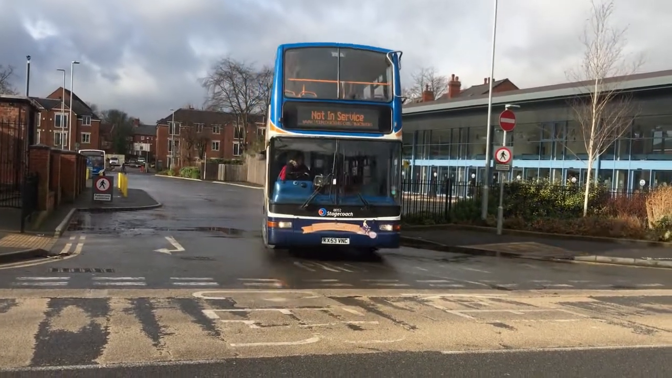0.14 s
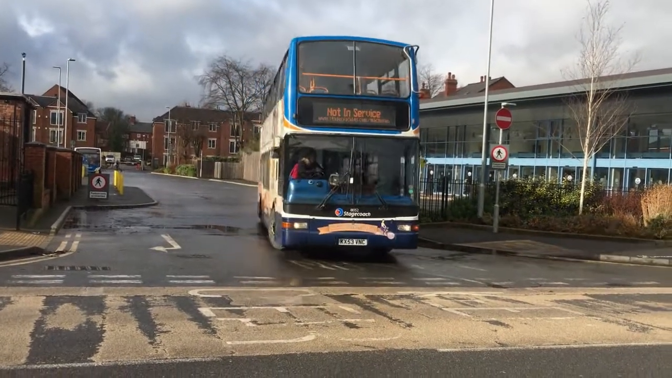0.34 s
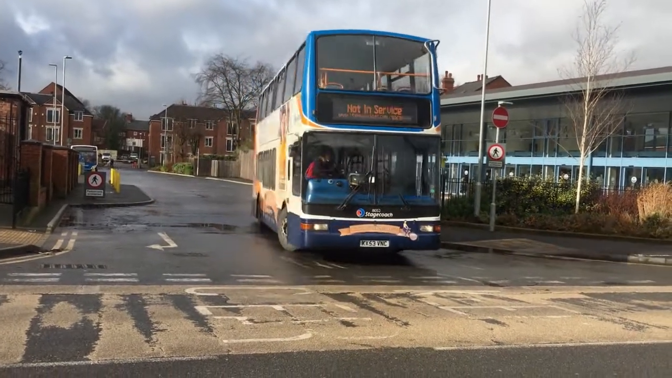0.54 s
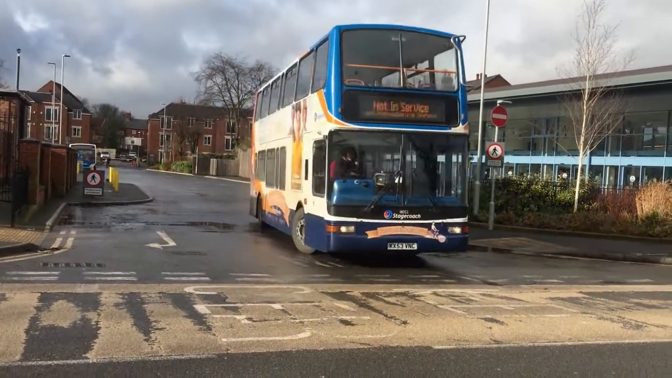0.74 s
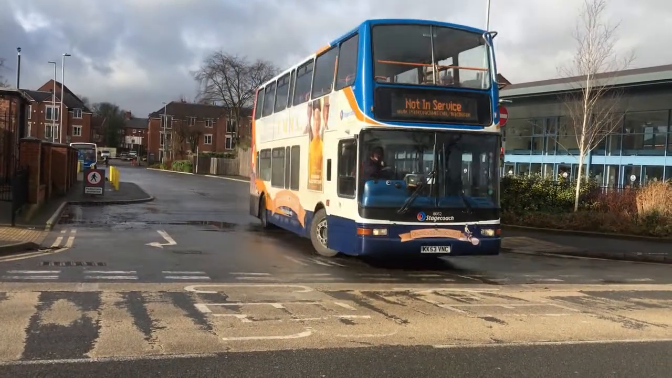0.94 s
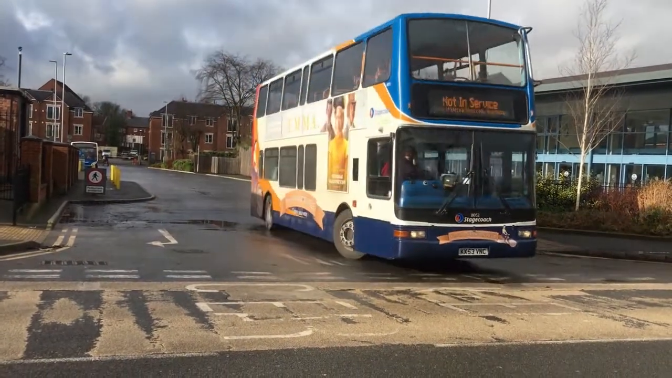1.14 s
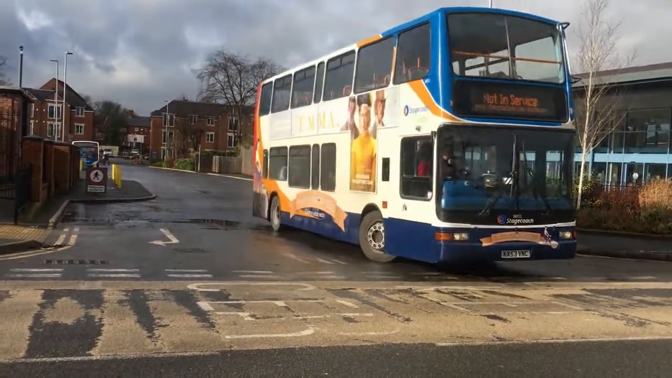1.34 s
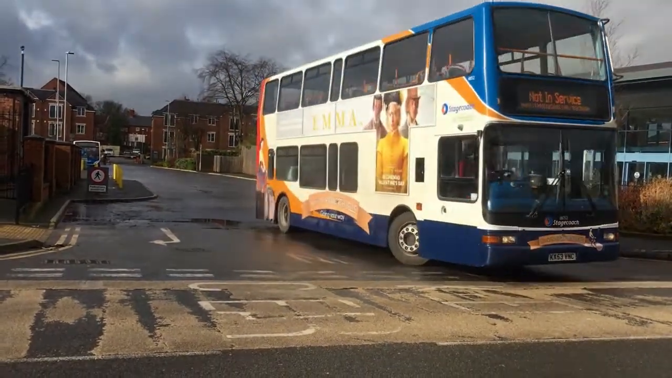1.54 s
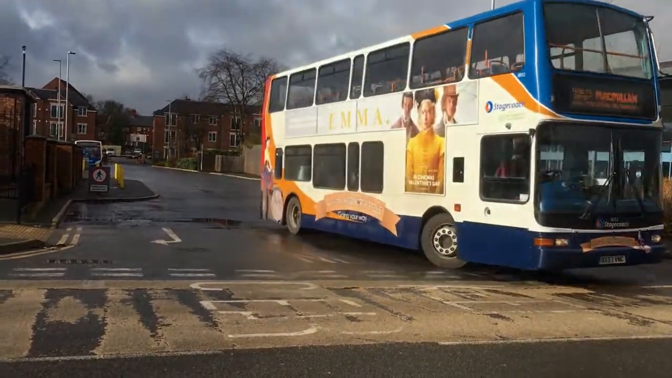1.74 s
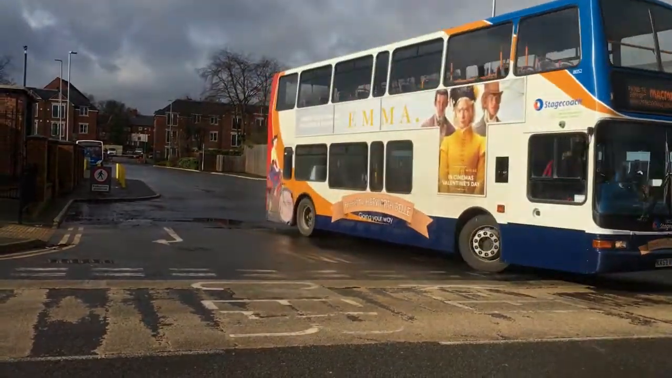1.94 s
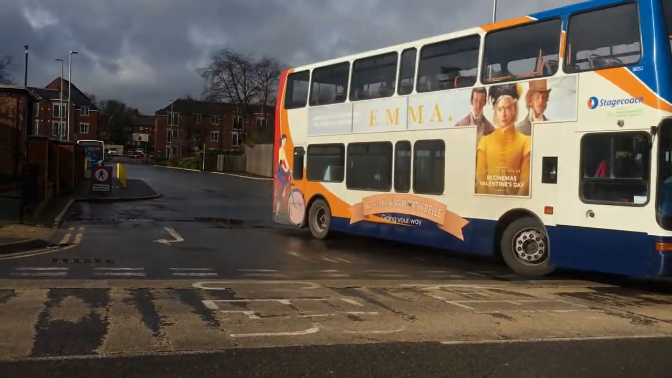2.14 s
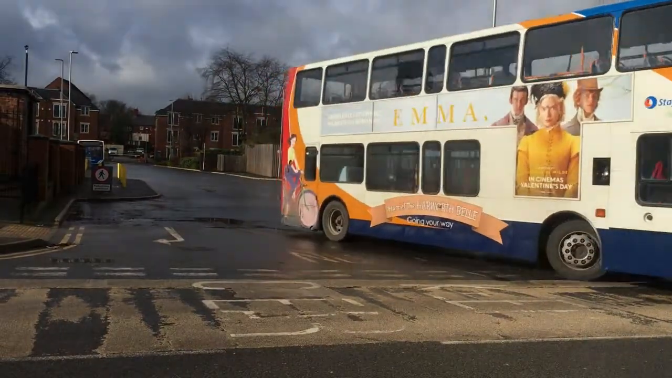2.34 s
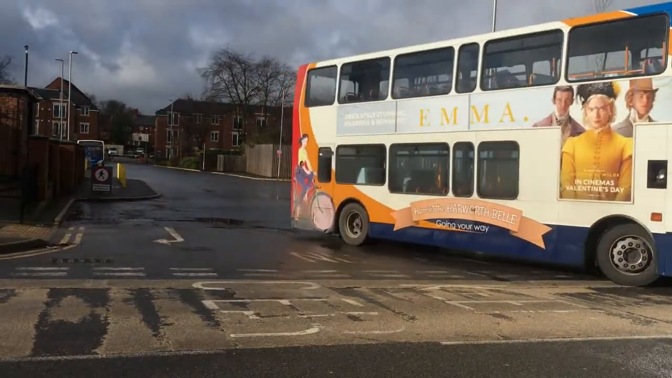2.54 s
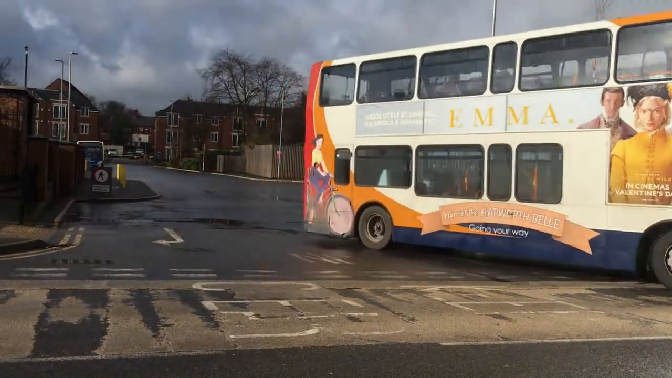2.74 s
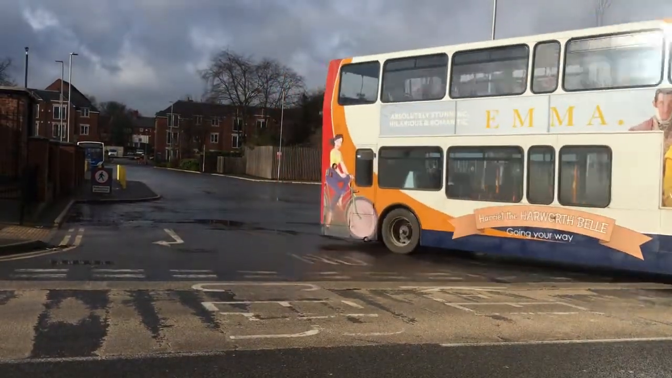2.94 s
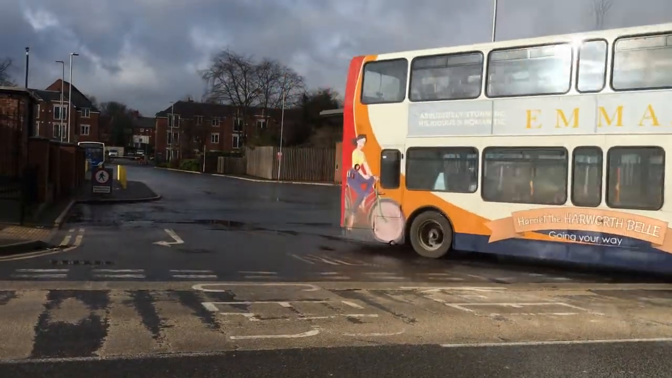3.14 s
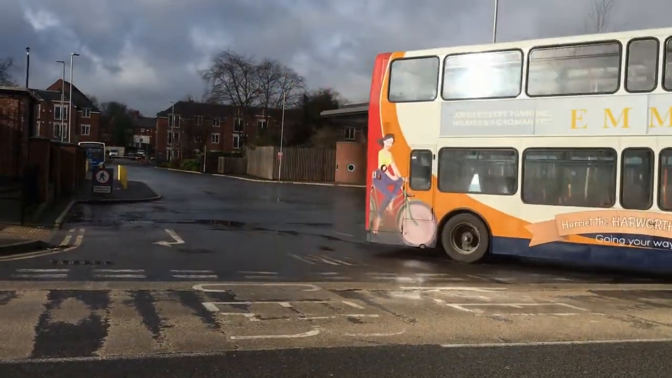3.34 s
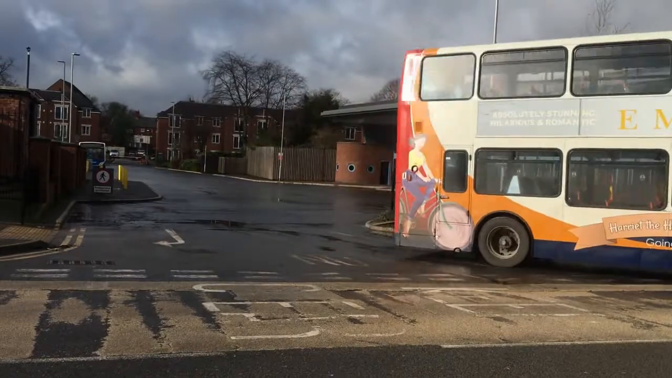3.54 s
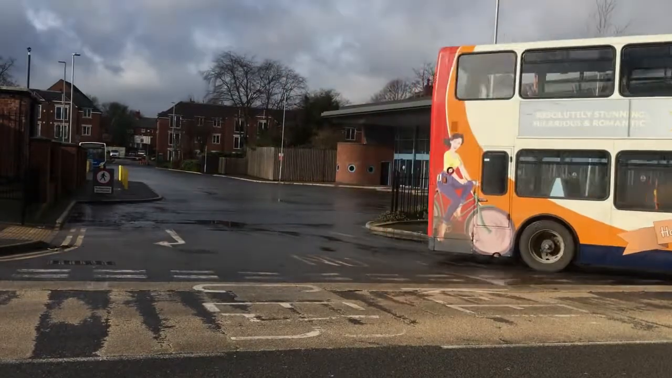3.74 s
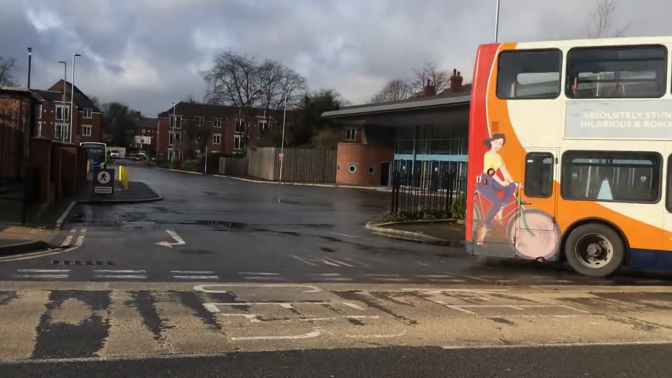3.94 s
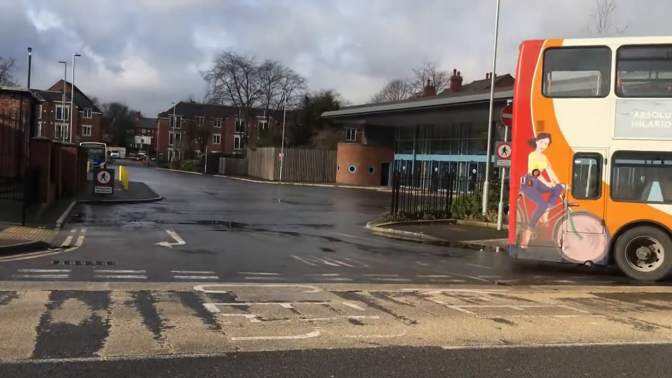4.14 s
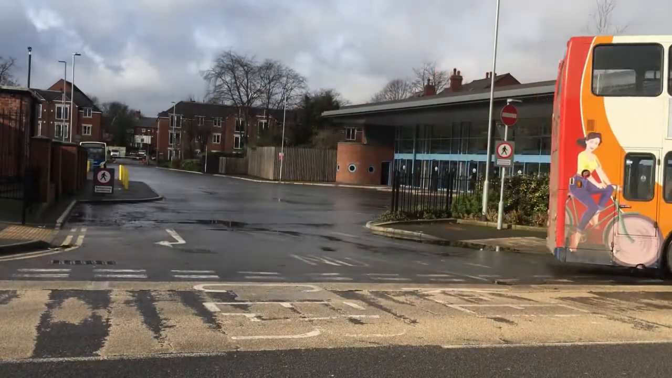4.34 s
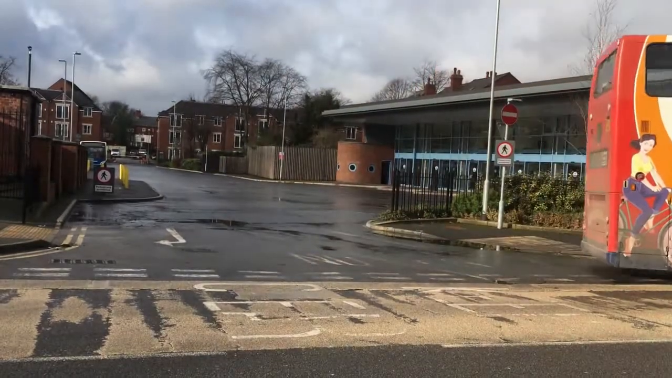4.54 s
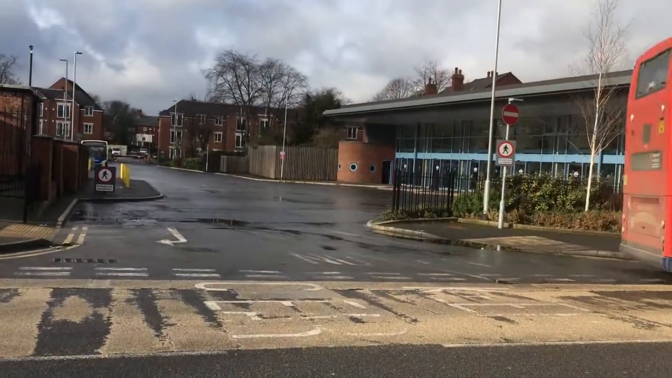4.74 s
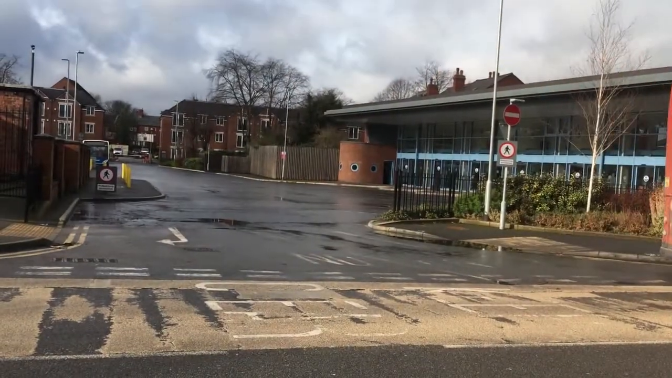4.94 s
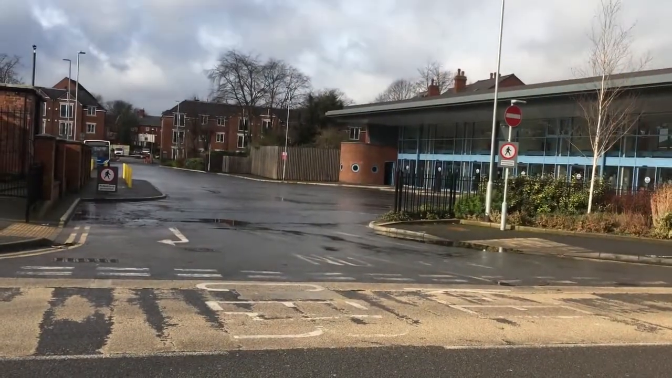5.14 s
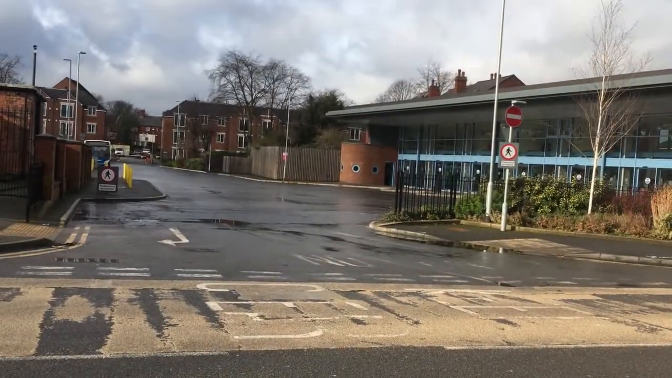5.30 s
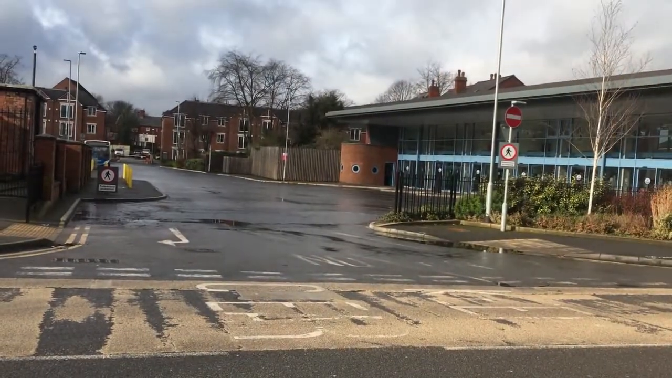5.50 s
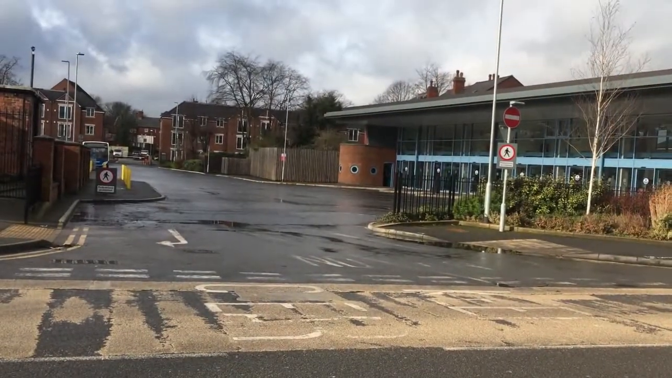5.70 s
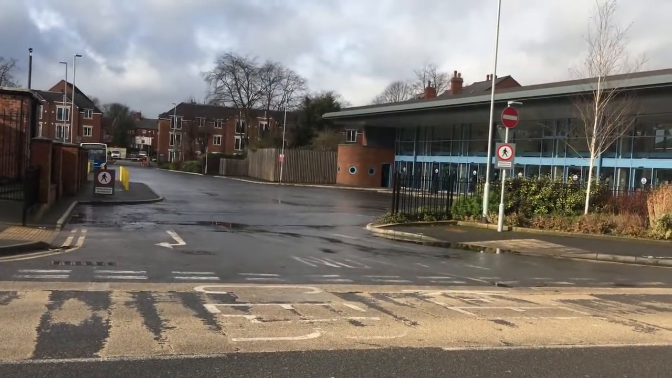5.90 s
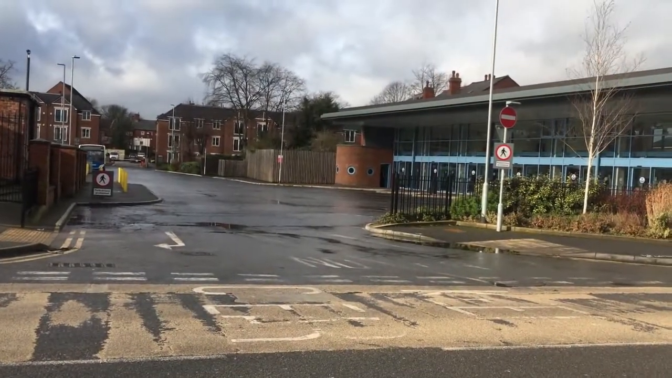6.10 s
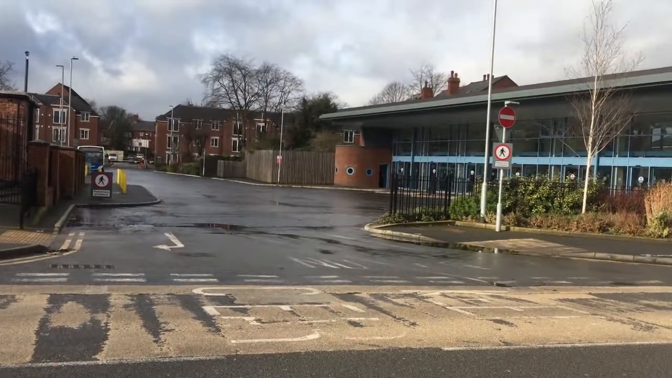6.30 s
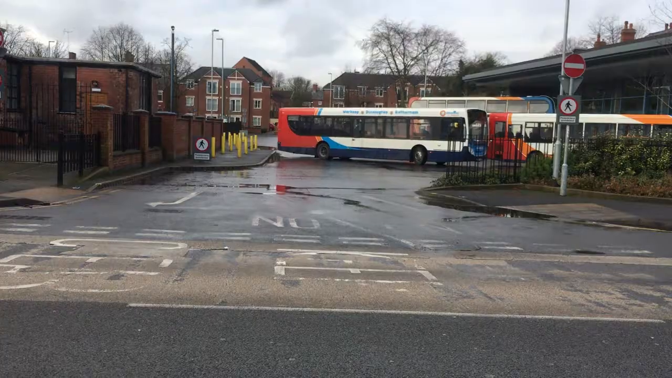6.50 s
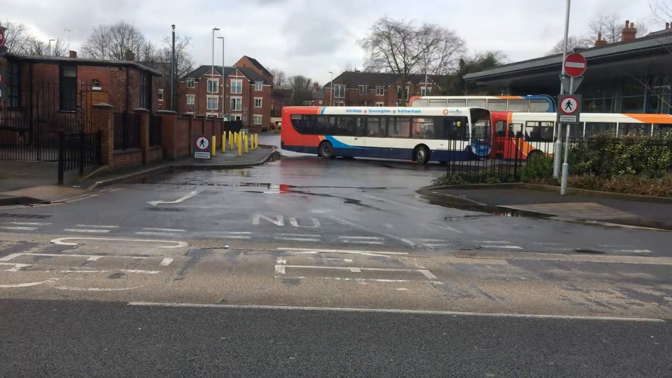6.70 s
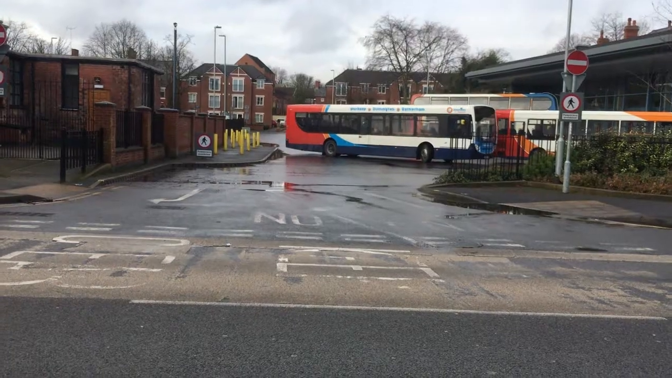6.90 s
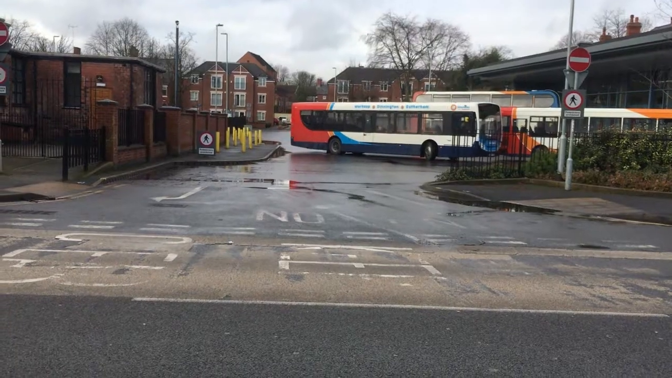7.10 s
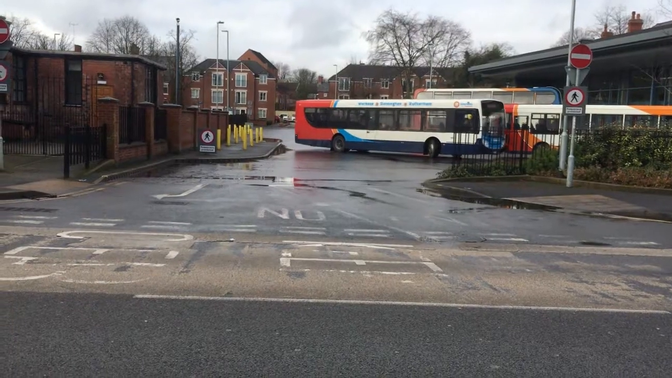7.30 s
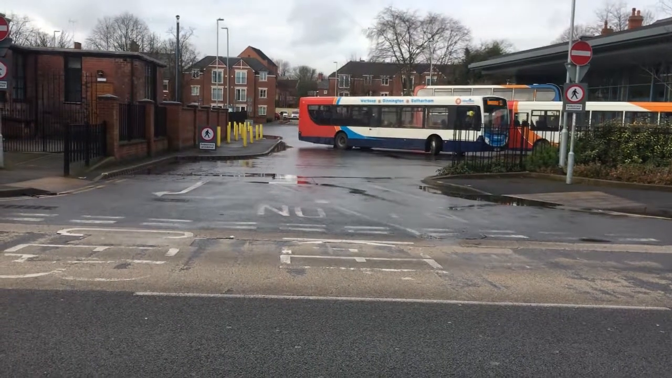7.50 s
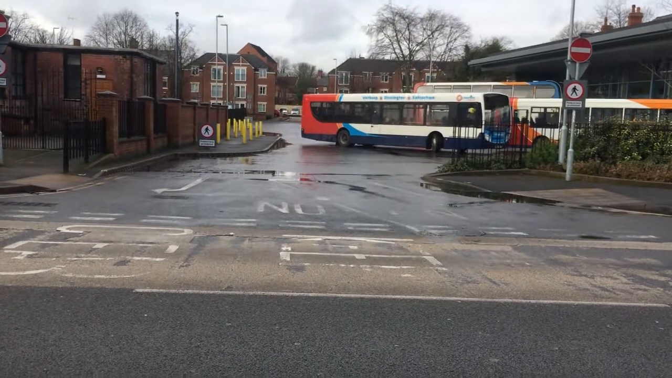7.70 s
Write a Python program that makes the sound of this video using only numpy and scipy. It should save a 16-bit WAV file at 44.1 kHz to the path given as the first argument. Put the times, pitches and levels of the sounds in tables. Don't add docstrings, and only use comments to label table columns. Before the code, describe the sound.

A handheld-sounding, wind-buffeted microphone beside a wet road catches a double-decker diesel pulling out. Its steady idle climbs to a droning, clattering roar, with faint tyre hiss, then falls away with a descending gear whine. The sound cuts out for an instant and returns as calmer, low street rumble, with another engine humming up far away.

```python
import sys
import numpy as np
from scipy import signal
from scipy.fft import irfft, next_fast_len
from scipy.io import wavfile
from scipy.ndimage import uniform_filter1d

SR = 44100
rng = np.random.default_rng(int(sys.argv[2]) if len(sys.argv) > 2 else 0)


def elevation(decibels):
    levels = np.asarray(decibels, float)
    return 10 ** (levels / 20)


def unload_wav(signal):
    wavfile.write(
        sys.argv[1],
        SR,
        np.round(np.clip(np.atleast_2d(signal).T, -1, 1) * 32767).astype(np.int16),
    )


N = 342068
PADDED = next_fast_len(N)

# (start [s], end [s])
SILENCE = (6.37795, 6.42582)

# (frequency [Hz], density [dB per Hz])
STREET_COLOUR = [(25, -2.5), (50, 8), (100, -11), (160, -6), (250, -11), (450, -15), (950, -13.5),
                 (1500, -22.5), (2200, -32), (3200, -42.5), (4600, -51), (7000, -63), (10000, -76.5),
                 (15500, -100)]
# (time [s], level [dB])
STREET_LEVEL = [(0, -47.5), (2, -50), (4.5, -41.5), (6.38, -41), (6.45, -42), (6.9, -40.5), (7.3, -41.5),
                (7.76, -39.5)]
# (start [s], end [s], frequency [Hz], level [dB])
STATION_HUMS = [
    (.75, 1.3, 862, -62),
    (0, .9, 2600, -78),
    (.8, 1.4, 3900, -87),
    (6.5, 7.1, 938, -58),
    (6.43, 7.1, 172, -52),
]
# (time [s], frequency [Hz], level [dB])
FAR_ENGINE = [
    (6.9, 49.2, -74),
    (7.15, 49.42, -54),
    (7.4, 54.5, -43.5),
    (7.76, 54.63, -45),
]

# (time [s], level [dB])
BREEZE = [(0, -45.5), (1, -42.5), (1.9, -42), (2.5, -38), (3, -39.5), (4.3, -39), (4.65, -38), (5.2, -41),
          (6.3, -41.5), (6.6, -50), (7.76, -48.5)]
# (start [s], hold [s], level [dB], edge [dB])
GUSTS = [(0.164, 0.04, -26, -24), (0.434, 0.033, -34.5, -32), (.52, 0.014, -43, -34),
         (0.595, 0.013, -30.5, -6), (0.639, 0.065, -28.5, -15), (0.716, .015, -34, -25),
         (1.296, 0.011, -29, -21), (1.332, 0.014, -32, -5.5), (1.554, .03, -26, -22),
         (1.662, 0.017, -29.5, -8), (1.698, .03, -28.5, -5), (1.755, .02, -30.5, -14),
         (2.021, 0.014, -33.5, -23), (2.703, 0.024, -33.5, -13), (2.998, .02, -29.5, -11.5),
         (3.099, 0.025, -34.5, -20), (3.172, 0.02, -32.5, -19), (3.222, 0.12, -34.5, -20),
         (3.458, 0.011, -21, -25), (3.503, .07, -28, -14), (3.624, 0.02, -32, -22),
         (3.774, 0.091, -36, -20), (3.922, 0.024, -26, -9), (4.044, 0.043, -25.5, -18),
         (4.115, 0.078, -28, -8), (4.207, 0.017, -29.5, -14), (4.296, 0.041, -28, -3),
         (4.485, 0.014, -26, -9), (4.529, 0.015, -29, -4), (5.107, 0.0093, -38, -11)]
# (frequency [Hz], density [dB per Hz])
THUMP_COLOUR = [(25, -30.5), (44, -1), (62, 7), (90, -22.5), (140, -40), (250, -120)]
# (frequency [Hz], density [dB per Hz])
BUFFET_COLOUR = [(40, -22), (75, 4), (130, 2), (200, -7), (300, -25.5), (450, -53), (900, -130)]
# (frequency [Hz], density [dB per Hz])
FLUTTER_COLOUR = [(100, -67.5), (150, -38), (230, 1), (320, -4), (400, -13), (550, -24), (800, -49.5),
                  (1500, -130)]

# (frequency [Hz], density [dB per Hz])
SPRAY_COLOUR = [(1500, -56.5), (2800, 1.5), (3800, -1.5), (4700, -5), (6500, -10), (8000, -18),
                (11000, -24), (15500, -40.5)]
# (time [s], level [dB])
SPRAY_LEVEL = [(0, -75), (1.2, -74), (2, -74), (4, -68), (4.9, -68.5), (6.38, -71)]

# (time [s], frequency [Hz], level [dB])
BLOWER = [(1.95, 5100, -100), (2.1, 5350, -85), (2.3, 5700, -87), (2.55, 6250, -88), (2.76, 6660, -83),
          (2.9, 6800, -88), (3.1, 7100, -90), (3.3, 7250, -105)]
# (time [s], mesh frequency [Hz])
GEAR_SHAFT = [(4.4, 1308), (4.6, 1228), (4.75, 1172), (4.88, 1085), (5.05, 985), (5.2, 935), (5.5, 900),
              (5.9, 875), (6.5, 850)]
# (multiple of mesh frequency, start [s], end [s], level [dB])
GEAR_MESHES = [(1, 4.75, 5.1, -54), (1, 4.95, 6.5, -56.5), (3, 5.3, 6.5, -70.5), (4, 5.3, 6.5, -77),
               (5, 5, 6.5, -81), (2, 4.74, 4.96, -57.5), (2, 4.66, 5.2, -63), (2, 5.1, 5.42, -67),
               (1.72, 4.38, 4.6, -57), (1.72, 4.54, 4.8, -58), (1.61, 4.75, 5.0, -63),
               (1.63, 4.93, 5.2, -58.5), (1.61, 5.15, 5.4, -63)]

# (time [s], firing rate [firings per s])
FIRING_RATE = [(0, 36.1), (1.25, 36), (1.45, 41.3), (1.7, 45.5), (2, 49.3), (2.15, 51.5), (2.45, 55),
               (2.6, 56.2), (2.9, 58.3), (4.2, 58.1), (4.55, 56), (4.7, 54.2), (4.85, 50), (5.15, 40),
               (5.3, 38.5), (5.6, 36.6), (5.9, 36.1), (6.38, 35.9)]
# (time [s], level [dB])
BOOM_LEVEL = [(1.3, -31), (1.57, -29.5), (1.78, -28.5), (1.83, -24.5), (2.1, -26), (2.21, -21.5),
              (2.4, -24.5), (2.65, -22.5), (2.8, -26), (2.88, -29), (3.45, -30.5), (3.6, -36), (4.13, -41),
              (4.22, -27.5), (4.3, -31), (4.7, -44), (4.84, -28.5), (4.95, -45)]
# (thirds of firing rate,
# front idling [dB], front pulling [dB], rear idling [dB], rear pulling [dB])
ENGINE_ORDERS = [(6, -54, -40, -42, -33), (8, -50, -44, -58, -50), (9, -60, -51, -56, -44),
                 (10, -40, -50, -46, -50), (11, -62, -51, -56, -44), (12, -39, -48, -44, -52),
                 (14, -60, -52, -56, -42), (15, -51, -52, -54, -50), (16, -60, -62, -52, -48),
                 (18, -64, -56, -45, -58), (30, -72, -63, -64, -54), (38, -76, -64, -64, -53.5),
                 (41, -76, -66, -66, -57), (52, -74, -68, -66, -57), (60, -76, -70, -70, -60),
                 (70, -76, -70, -70, -60), (96, -80, -74, -74, -64), (117, -80, -72, -76, -65)]
# (start [s], end [s])
TAIL_TURN = (2.6, 3.9)
# (time [s], level [dB])
CLATTER_LEVEL = [(0, -56.5), (.6, -57.5), (1, -55), (1.6, -53), (2.4, -49.5), (3.2, -47.5), (3.55, -48.5),
                 (3.85, -45.5), (4.2, -48), (4.58, -45.5), (4.7, -49), (5.2, -52), (6.38, -53)]
# (frequency [Hz], density [dB per Hz])
CLATTER_COLOUR = [(210, -15.5), (450, -3), (650, -4.5), (1000, 1.5), (1400, -2.5), (1800, -9),
                  (2300, -11.5), (2900, -23), (3800, -33), (4600, -44), (6500, -63.5), (9000, -110)]
# (frequency [Hz], width [Hz], level [dB])
CASING_MODES = [(603, 74, -12), (720, 22, -12.5), (1011, 50, -12.5), (1375, 21, -16), (2271, 100, -18.5)]

# (frequency [Hz], density [dB per Hz])
SELF_NOISE_COLOUR = [(1000, -9.5), (4000, -1.5), (8000, -2.5), (11000, -2.5), (16000, -12), (20000, -28)]
# (frequency [Hz], width [Hz], depth [dB])
PORT_NOTCHES = [(4950, 190, -6), (10500, 600, -8)]

LIFT_OFF_S, IDLE_CATCH_S, MOVES_OFF_S, PEDAL_S = 4.5, 5.2, 0.82, 0.21
ORDERS_DB, OVERRUN_ORDERS_DB, WAITING_ORDERS_DB = -0.5, -13.5, -6
RECEDING_DB_PER_S = -5.5
BRIGHT_FACING_DB, BRIGHT_LEAVING_DB = 4, 2
BREEZE_EDGE_DB, LUMPS_DB = -8, 2
GUST_RISE_S, GUST_FALL_S = 0.0066, 0.0078
THUMP_DB, THUMP_PER_EDGE = -13, -0.51
EVEN_S, EVEN_SHARE = 0.036, 0.68


def rms_one(x):
    return x / np.sqrt(np.mean(x ** 2) + 1e-20)


def in_time(rows):
    s, *columns = np.transpose(rows)
    return [np.interp(np.arange(N) / SR, s, c) for c in columns]


def fading(start_s, end_s, db):
    fade_s, fade_db = .1, -15
    times = [start_s, start_s + fade_s, end_s - fade_s, end_s]
    return times, [db + fade_db, db, db, db + fade_db]


def drift(rate, size=N):
    r = np.exp(-80 * np.pi * rate / SR)
    draws = rng.standard_normal(size // 40 + 2002)
    slow = signal.lfilter([1], [1, -2 * r, r * r], draws)[2000:]
    return np.interp(np.arange(size) / 40, np.arange(len(slow)), rms_one(slow))


def coloured(spectrum):
    octave = np.log2(np.arange(1, PADDED // 2 + 2) * SR / PADDED)
    hz, level_db = np.transpose(spectrum)
    chance = rng.standard_normal((len(octave), 2)) @ [1, 1j]
    bins = chance * elevation(np.interp(octave, np.log2(hz), level_db))
    return bins * PADDED / np.sqrt(2 * np.sum(abs(bins) ** 2)), octave


def steady(spectrum):
    return irfft(coloured(spectrum)[0], PADDED)[:N]


def noise_bands(spectrum, patchy_db, rate):
    bins, octave = coloured(spectrum)
    lowest, highest = np.log2(spectrum[0][0]), np.log2(spectrum[-1][0])
    centres = np.arange(np.floor(lowest), highest + 1)
    bands = []
    for centre in centres:
        band = irfft(bins * np.clip(1 - abs(octave - centre), 0, 1), PADDED)[:N]
        bands.append(band * elevation(patchy_db * drift(rate)))
    return 2 ** centres, np.array(bands)


def evened(x):
    span = int(EVEN_S * SR)
    swell = uniform_filter1d(uniform_filter1d(x ** 2, size=span), size=span)
    return rms_one(x / (swell + .05) ** (EVEN_SHARE / 2))


def resonance(x, hz, width):
    r = np.exp(-np.pi * width / SR)
    poles = [1, -2 * r * np.cos(2 * np.pi * hz / SR), r * r]
    return signal.lfilter([(1 - r * r) / 2, 0, (r * r - 1) / 2], poles, x)


def tone(rows, wobble, flicker_db, multiple=1):
    s, hz, level_db = np.transpose(rows)
    at = np.arange(round(s[0] * SR), min(round(s[-1] * SR), N))
    pitch = multiple * np.interp(at / SR, s, hz) * (1 + wobble * drift(34.0, size=len(at)))
    gain = np.sqrt(2) * elevation(np.interp(at / SR, s, level_db) + flicker_db * drift(23, size=len(at)))
    out = np.zeros(N)
    out[at] = gain * np.sin(2 * np.pi * (np.cumsum(pitch) / SR + rng.random()))
    return out


def street():
    _, bands = noise_bands(STREET_COLOUR, patchy_db=0.6, rate=0.93)
    return elevation(in_time(STREET_LEVEL)[0]) * bands.sum(axis=0)


def hums():
    out = np.zeros(N)
    for start_s, end_s, hz, db in STATION_HUMS:
        times, levels_db = fading(start_s, end_s, db)
        out += tone(np.c_[times, [hz] * 4, levels_db], wobble=0.0013, flicker_db=3.0)
    return out


def far_engine():
    hum = tone(FAR_ENGINE, wobble=.012, flicker_db=4.0)
    third_partial = tone(FAR_ENGINE, wobble=.008, flicker_db=2.5, multiple=3)
    return elevation(-4) * hum + elevation(-.5) * third_partial


def wind():
    def layers(edge_db):
        return elevation(np.array([[THUMP_DB + THUMP_PER_EDGE * edge_db], [0], [edge_db]]))
    t = np.arange(N) / SR
    push = elevation(in_time(BREEZE)[0] + LUMPS_DB * drift(6.8)) * layers(BREEZE_EDGE_DB)
    for start_s, hold_s, db, edge_db in GUSTS:
        near = slice(int((start_s - .1) * SR), int((start_s + hold_s + .15) * SR))
        rising = (start_s - t[near]) / GUST_RISE_S
        falling = (t[near] - start_s - hold_s) / GUST_FALL_S
        away = np.maximum(rising, falling)
        push[:, near] += elevation(db) * np.exp(-np.maximum(away, 0)) * layers(edge_db)
    colours = (THUMP_COLOUR, BUFFET_COLOUR, FLUTTER_COLOUR)
    thump, buffet, flutter = (evened(steady(colour)) for colour in colours)
    flutter = elevation(2.5 * drift(36)) * flutter
    return elevation(0.45 * drift(18)) * (push[0] * thump + push[1] * buffet + push[2] * flutter)


def tyres():
    return elevation(in_time(SPRAY_LEVEL)[0] + 3.5 + 0.7 * drift(2.5)) * steady(SPRAY_COLOUR)


def whines():
    out = tone(BLOWER, wobble=.012, flicker_db=4.0)
    for multiple, start_s, end_s, db in GEAR_MESHES:
        s = np.linspace(start_s, end_s, 40)
        mesh_hz = np.interp(s, *np.transpose(GEAR_SHAFT))
        level_db = np.interp(s, *fading(start_s, end_s, db))
        out += tone(np.c_[s, mesh_hz, level_db], wobble=.006, flicker_db=3.5, multiple=multiple)
    return out


def exhaust(per_s, phase, lifted, caught, moving):
    t = np.arange(N) / SR
    load = np.clip((per_s - 38) / 4, 0, 1)
    boom_db = in_time(BOOM_LEVEL)[0] + 0.59 * drift(6.2)
    out = load * elevation(boom_db) * np.sqrt(2) * np.sin(phase)
    orders_db = ORDERS_DB + OVERRUN_ORDERS_DB * (lifted - caught) + WAITING_ORDERS_DB * (1 - moving)
    orders_db = orders_db + RECEDING_DB_PER_S * np.maximum(t - IDLE_CATCH_S - .3, 0)
    rear = np.interp(t, TAIL_TURN, [0, 1])
    views = np.array([(1 - rear) * (1 - load), (1 - rear) * load, rear * (1 - load), rear * load])
    for thirds, *levels_db in ENGINE_ORDERS:
        level_db = levels_db @ views + orders_db + 1.6 * drift(4)
        out += elevation(level_db) * np.sin(thirds * phase / 3 + 2 * np.pi * rng.random())
    return out


def clatter(phase, lifted):
    bright_db = BRIGHT_FACING_DB + (BRIGHT_LEAVING_DB - BRIGHT_FACING_DB) * lifted
    centres, bands = noise_bands(CLATTER_COLOUR, patchy_db=0.06, rate=2.3)
    tilt = np.clip(np.log2(centres / 1000), 0, 2)[:, None]
    rattle = (bands * elevation(tilt * bright_db)).sum(axis=0)
    white = rng.standard_normal(N)
    for hz, width, level_db in CASING_MODES:
        ringing = resonance(resonance(white, hz, width), hz, width)
        rattle += elevation(level_db) * rms_one(ringing)
    knock = 1 + 0.14 * np.cos(phase) + 0.075 * np.cos(phase / 3) + 0.11 * np.cos(2 * phase)
    return elevation(in_time(CLATTER_LEVEL)[0] + 1.5) * knock * rattle


def engine():
    per_s, = in_time(FIRING_RATE)
    phase = 2 * np.pi * np.cumsum(per_s) / SR
    t = np.arange(N) / SR
    pedal_times = (LIFT_OFF_S, IDLE_CATCH_S, MOVES_OFF_S)
    lifted, caught, moving = (np.clip((t - s) / PEDAL_S, 0, 1) for s in pedal_times)
    return exhaust(per_s, phase, lifted, caught, moving) + clatter(phase, lifted)


def scene():
    before = np.arange(N) / SR < SILENCE[0]
    bus = (tyres() + whines() + engine()) * before
    return (street() + hums() + far_engine() + wind() + bus)[None]


def roll_off(x):
    return signal.sosfilt(signal.butter(12, 15750, fs=SR, output="sos"), x)


def record(dry):
    edge_s = .00003
    x = dry + elevation(-82) * steady(SELF_NOISE_COLOUR)
    for hz, width, depth_db in PORT_NOTCHES:
        x = x - (1 - elevation(depth_db)) * resonance(x, hz, width)
    x = signal.sosfilt(signal.butter(3, 38, "high", fs=SR, output="sos"), x)
    t = np.arange(N) / SR
    x = x * np.clip(np.maximum(SILENCE[0] - t, t - SILENCE[1]) / edge_s, 0, 1)
    x = x * np.clip(np.minimum(t, t[-1] - t) / (8 * edge_s), 0, 1)
    return roll_off(x)


dry = scene()
out = record(dry)
unload_wav(out)
```